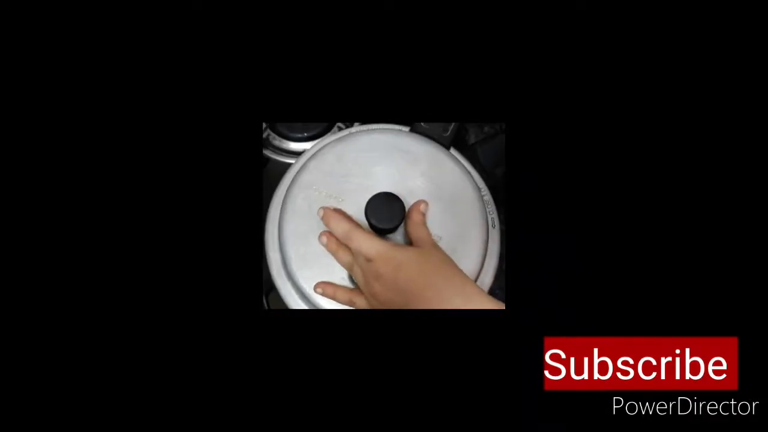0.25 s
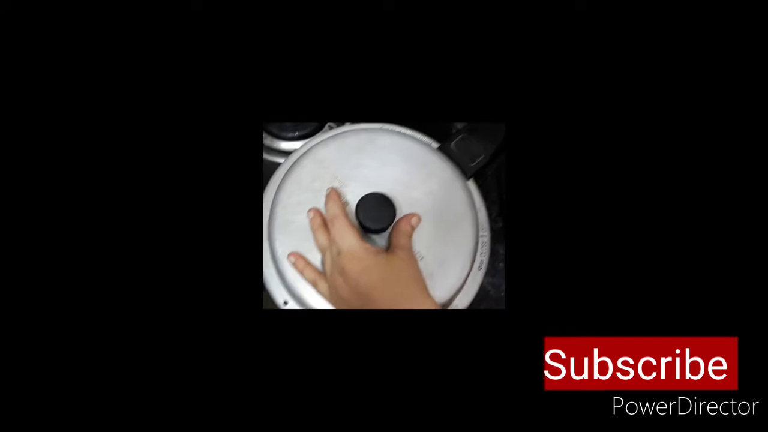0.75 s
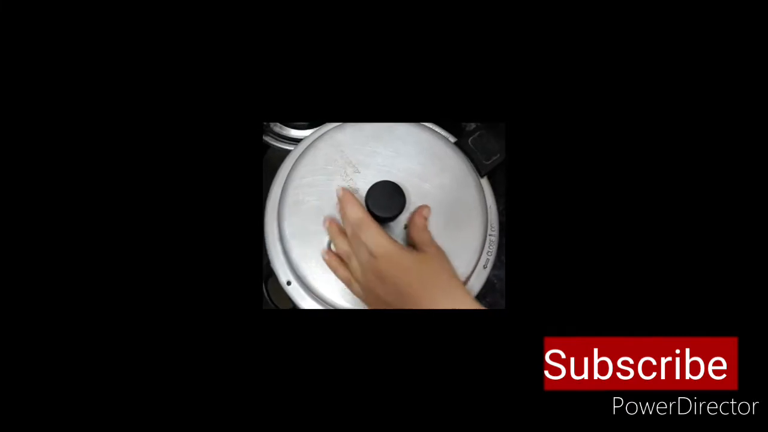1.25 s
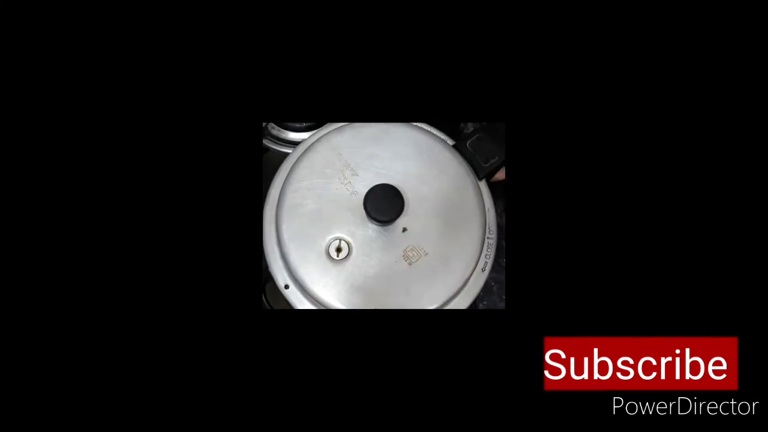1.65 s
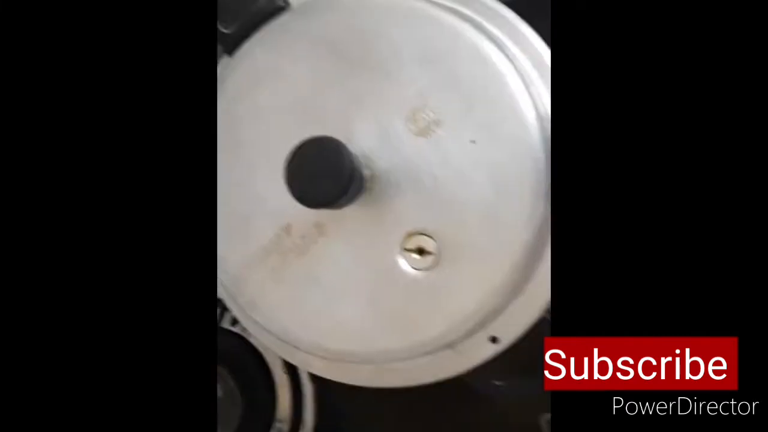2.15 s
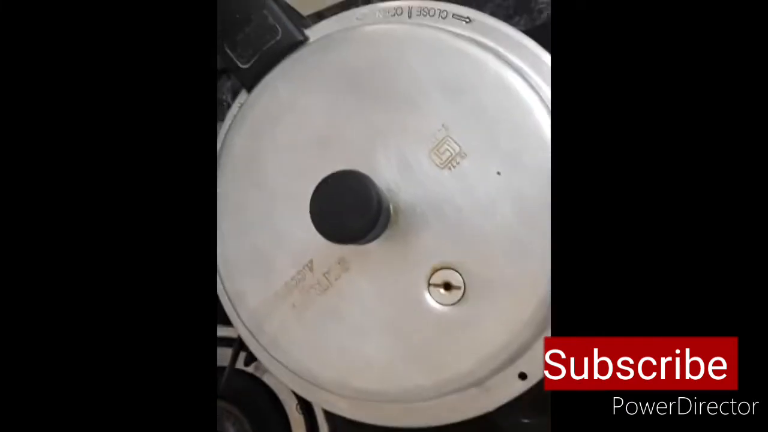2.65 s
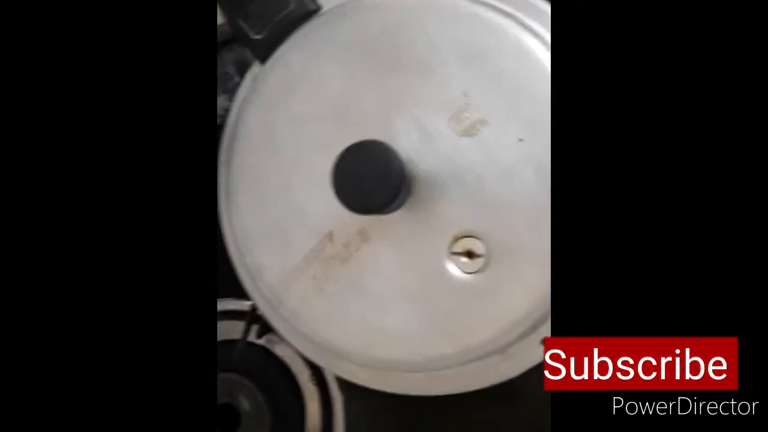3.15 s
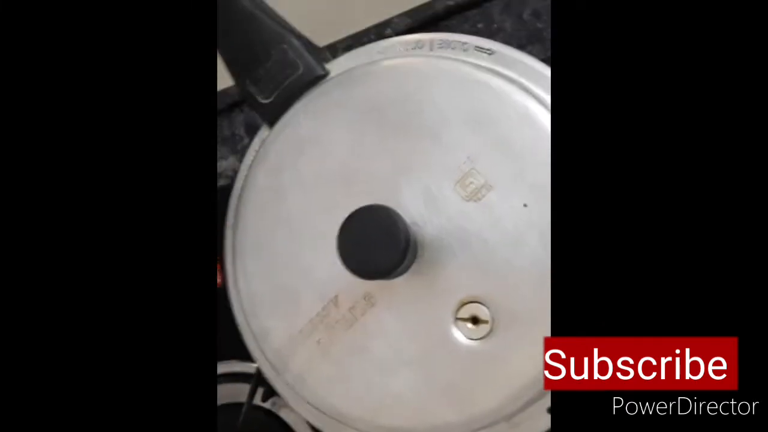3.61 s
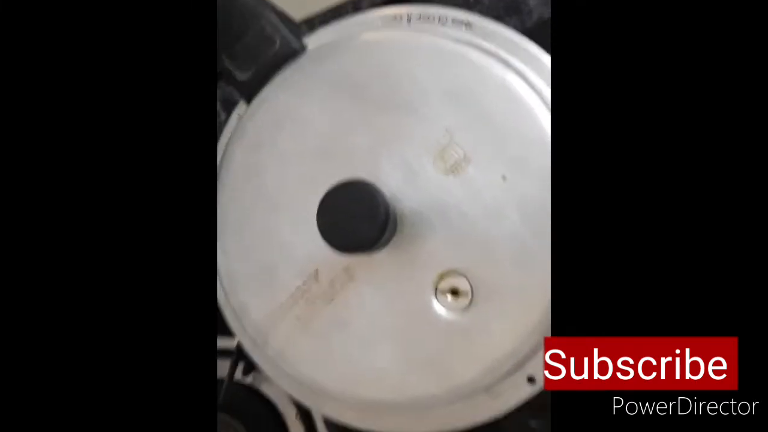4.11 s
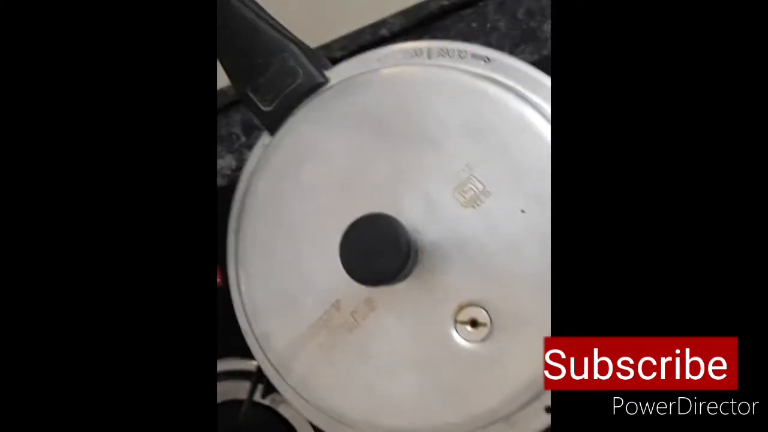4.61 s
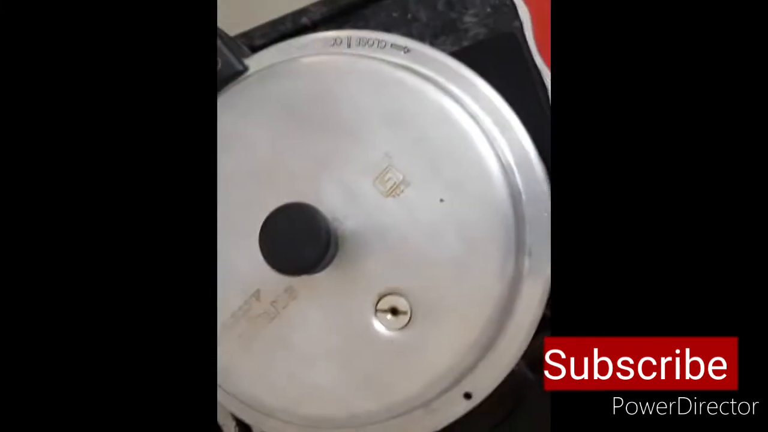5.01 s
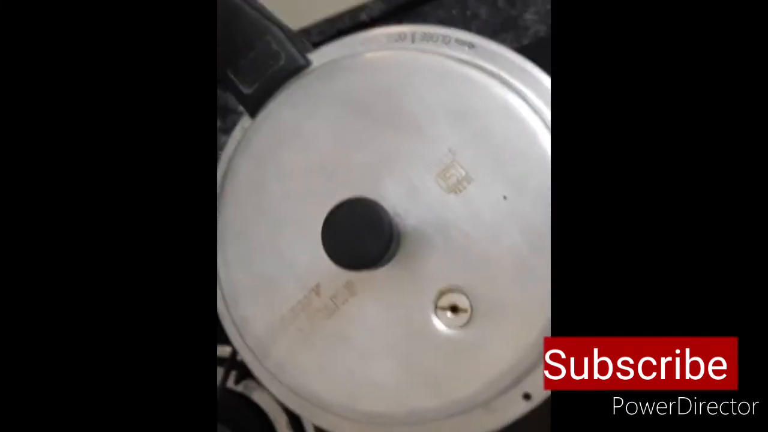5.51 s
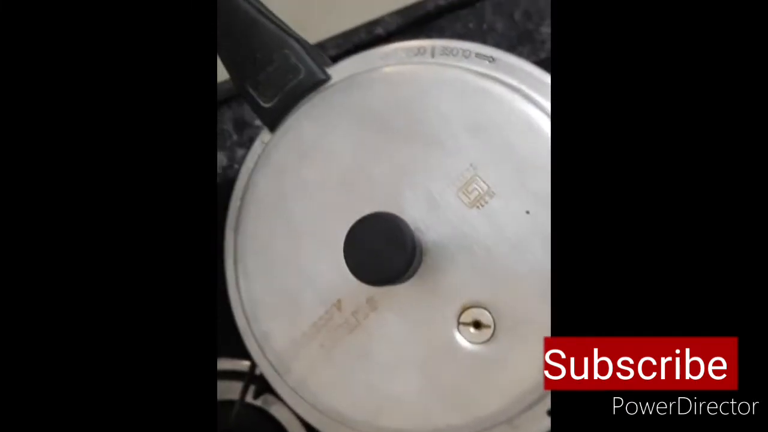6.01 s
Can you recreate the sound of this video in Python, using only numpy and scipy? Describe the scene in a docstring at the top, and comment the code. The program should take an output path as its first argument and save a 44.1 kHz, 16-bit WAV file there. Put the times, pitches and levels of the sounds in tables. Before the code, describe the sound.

A hand rubs and knocks a metal cooker lid, faint steam starts leaking, then a loud steady hiss blasts out, buffeting the close microphone.

```python
"""A pressure cooker on the stove in a small hard-walled kitchen, the microphone just above its lid.
First, over a simmering floor of noise, a hand rubs the lid amid knocks and ticks: friction noise, struck modes, damped
tones. Then the valve starts to leak, as sputtering noise that grows in two steps. After an instant of silence the
weight vents at full blast, as noise through the vent's resonances. Last, the microphone moves over the jet, where the
hiss is brighter and gusts and single eddies of steam buffet it."""
import sys
import numpy as np
from scipy import signal
from scipy.fft import rfft, irfft, next_fast_len
from scipy.io import wavfile
from scipy.ndimage import uniform_filter1d, minimum_filter1d

SR = 44100
rng = np.random.default_rng(int(sys.argv[2]) if len(sys.argv) > 2 else 0)


def to_wav(s):
    """Save 16-bit WAV."""
    ch = np.atleast_2d(s).T  # columns
    pcm = np.round(np.clip(ch, -1, 1) * 32767)  # PCM
    wavfile.write(sys.argv[1], SR, pcm.astype(np.int16))


N = 276219
TIME = np.arange(N) / SR
BINS_HZ = np.maximum(np.fft.rfftfreq(2 * N, 1 / SR), 1)
CUTOFF_HZ = 15500  # top of the microphone's range


def from_db(db):
    """Decibels to gain."""
    return 10 ** (np.asarray(db) / 20)


def rms_one(x):
    """Scale to an rms of 1."""
    return x / np.sqrt(np.mean(x ** 2) + 1e-20)


def in_time(rows):
    """One curve per column after the time column, joined by straight lines."""
    times_s, *columns = np.transpose(rows)
    return [np.interp(TIME, times_s, column) for column in columns]


def at_hz(points, hz):
    """Read a table on a log-frequency axis."""
    points = np.array(points)
    return np.interp(np.log(hz), np.log(points[:, 0]), points[:, 1])


def shaped(x, gain):
    """Give a steady sound a gain per frequency."""
    size = next_fast_len(N)
    hz = np.arange(size // 2 + 1) * SR / size
    return irfft(rfft(x, size) * np.interp(hz, BINS_HZ, gain), size)[:N]


def noise(colour):
    """Noise of the given spectrum, rms 1."""
    white = rng.standard_normal(N)
    return rms_one(shaped(white, from_db(at_hz(colour, BINS_HZ))))


def cut(x, hz, kind, order=2):
    """Causal Butterworth filter."""
    sos = signal.butter(order, np.clip(hz, 10, .45 * SR), kind, fs=SR, output="sos")
    return signal.sosfilt(sos, x + 1e-18)


def band(x, low_hz, high_hz):
    """The part of a steady sound between two frequencies."""
    return shaped(x, 1. * (BINS_HZ >= low_hz) * (BINS_HZ < high_hz))


def drift(rate_hz):
    """Random wander of spread 1, mostly slower than the given rate."""
    return rms_one(shaped(rng.standard_normal(N), 1 / (1 + (BINS_HZ / rate_hz) ** 2)))


def running_rms(x):
    """Level over about a seventh of a second."""
    return np.sqrt(uniform_filter1d(x ** 2, size=6000))


def lifted(resonances):
    """Gain per frequency of a few resonances standing out of a flat response."""
    gain = 1
    for hz, width_hz, lift_db in resonances:
        gain = gain + (from_db(lift_db) - 1) / (1 + (2 * (BINS_HZ - hz) / width_hz) ** 2)
    return gain


def swells(rows, rise_db_per_s, fall_db_per_s):
    """Gain of events that rise, hold and die away; overlapping ones add in power."""
    power = 0
    for start_s, hold_s, level_db in rows:
        before_s = np.maximum(start_s - TIME, 0)
        after_s = np.maximum(TIME - start_s - hold_s, 0)
        power = power + from_db(level_db - rise_db_per_s * before_s - fall_db_per_s * after_s) ** 2
    return np.sqrt(power)


# the simmering cooker and the room, relative spectrum: pitch_hz, level_db (per Hz)
FLOOR_COLOUR = [(25, -10), (86, 4), (173, -7.5), (300, -8.5), (700, -17), (1500, -28), (3000, -38),
                (3700, -12), (4700, -6.5), (6700, -21), (9500, -33), (14500, -22)]


def floor(level_db=-61):
    """The simmer and the room's own sound merge into one steady coloured noise."""
    return from_db(level_db) * noise(FLOOR_COLOUR)


# blows on and around the cooker; level before the band edges are cut, ring relative to it:
# start_s, level_db, low_edge_hz, high_edge_hz, rise_s, hollow_pitch_hz, lid_ring_db
KNOCK_EVENTS = [(0.001, -40.5, 1290, 5600, 0.00025, 4770, -30), (0.002, -39.5, 60, 2030, 0.0006, 900, -13),
                (0.117, -46.5, 60, 1100, .001, 392, -16), (0.165, -42.5, 60, 2300, 0.00088, 1000, -24),
                (0.371, -46.5, 60, 1100, 0.0018, 240, -20), (0.383, -37.5, 60, 1390, 0.00056, 760, -11),
                (0.761, -29, 90, 5400, 0.0035, 3900, -15.5), (0.978, -50, 200, 714, 0.002, 320, -25),
                (1.861, -34.5, 378, 746, 0.0042, 445, -27), (1.874, -40.5, 480, 4400, 0.0039, 640, -34)]
# relative spectrum of the blows: pitch_hz, level_db (per Hz)
KNOCK_SPECTRUM = [(50, -18), (85, -3.5), (125, -18), (180, -6), (250, -2), (340, -11.5), (430, -4.5),
                  (600, -9), (950, -8.5), (1400, -9.5), (1850, -4.5), (3000, -13.5), (4300, -10.5),
                  (6300, -20), (14000, -50)]
# ringing modes of the lid, level and decay before chance and the cap: pitch_hz, level_db, t60_s
LID_MODES = [(246, -1, 0.83), (430, -1.5, 1), (560, -34, 0.26), (870, 8, 0.19), (1240, 2, 0.25),
             (1615, -14, 0.54), (1750, 7, 0.26), (1880, -0.5, 0.75), (2460, 4, 0.25), (3600, -17, 0.33),
             (3800, -26, 0.25), (4200, 3, 0.36), (4673, -12, 0.26), (5100, -25, 0.26)]
# ring of the kitchen: pitch_hz, t60_s
KITCHEN_RING = [(100, 0.72), (260, 0.48), (700, 0.37), (1840, 0.42), (4850, 0.29), (12000, 0.15)]


def knocks(longest_s=0.71, direct_db=-3, direct_s=0.0021, hollow_db=5, hollow_q=5):
    """Each knock rings a hollow tone and the lid's modes, and sets the kitchen ringing, the bass longest."""
    out, age = np.zeros(N), TIME[:SR]
    fall_db = -60 * age  # divided by a t60, the decay in dB
    edges_hz = np.geomspace(50, 16000, 11)
    wash = noise(KNOCK_SPECTRUM)
    bands = []
    for low, high in zip(edges_hz, edges_hz[1:]):
        bands.append((band(wash, low, high), at_hz(KITCHEN_RING, np.sqrt(low * high))))
    chances = rng.standard_normal((len(KNOCK_EVENTS), len(LID_MODES)))
    for knock, chance in zip(KNOCK_EVENTS, chances):
        start_s, level_db, low_hz, high_hz, rise_s, hollow_hz, lid_db = knock
        start = max(int(start_s * SR), 0)
        room = sum(part[start:start + SR] * from_db(fall_db / t60) for part, t60 in bands)
        hollow = signal.lfilter(*signal.iirpeak(hollow_hz, hollow_q, fs=SR), room)
        metal = 0
        for (hz, mode_db, t60), c in zip(LID_MODES, chance):
            # each blow excites each mode by chance, with either sign
            ring = np.sign(c) * from_db(mode_db + 2 * c + fall_db / min(t60, longest_s))
            metal = metal + ring * np.sin(2 * np.pi * hz * age)
        # the direct sound stands out for the first few milliseconds
        attack = (1 - np.exp(-age / rise_s)) * (1 + from_db(direct_db) * np.exp(-age / direct_s))
        blow = (room + from_db(hollow_db) * hollow + from_db(lid_db) * metal) * attack
        out[start:start + SR] += from_db(level_db) * cut(cut(blow, low_hz, "high"), high_hz, "low")
    return out


# dry ticks, level before damping: start_s, level_db, pitch_hz
TICK_EVENTS = [(0.289, -27, 2600), (0.385, -25, 3500), (1.652, -29.5, 4500), (1.686, -32, 5200),
               (2.116, -23.5, 1500), (2.19, -28, 4500)]
# a finger bumps the microphone, level before damping: start_s, level_db, pitch_hz, length_s
MICROPHONE_BUMP = (2.117, -35, 88, .018)


def handling(tick_s=0.00016):
    """Tiny dry ticks close by, and one soft, quickly damped bump on the microphone's case."""
    out = np.zeros(N)
    for start_s, level_db, hz in TICK_EVENTS:
        age = np.maximum(TIME - start_s, 0)
        out += from_db(level_db) * np.sin(2 * np.pi * hz * age) * np.exp(-age / tick_s)
    start_s, level_db, hz, length_s = MICROPHONE_BUMP
    age = np.maximum(TIME - start_s, 0)
    return out + from_db(level_db) * np.sin(2 * np.pi * hz * age) * np.exp(-(age / length_s) ** 4)


# strokes of the palm on the lid: start_s, hold_s, level_db
PALM_STROKES = [(.36, 0.29, -50), (.59, 0.077, -44.5), (1.11, 0.015, -52), (1.36, .015, -62)]
STROKE_RISE_DB_PER_S, STROKE_FALL_DB_PER_S = 260, 130
# faint friction between strokes, until the hand stops resting on the lid
RESTING_HAND_DB, RESTING_ENDS_S = -66, 1.2
# relative spectrum of skin on metal: pitch_hz, level_db (per Hz)
FRICTION_COLOUR = [(59, -39), (100, -8), (188, -12), (300, -6), (682, -17), (936, -6), (1180, -13),
                   (1840, -11), (2470, -17), (2630, -17), (4660, -8.5), (9740, -35.5), (15500, -38)]


def rubbing(grip_db=0.8, body_hz=650):
    """Skin grips and slips on the metal; only a firm stroke moves the lid enough to sound its bass."""
    palm = swells(PALM_STROKES, STROKE_RISE_DB_PER_S, STROKE_FALL_DB_PER_S)
    resting = from_db(RESTING_HAND_DB) * (TIME < RESTING_ENDS_S)
    stroke = np.hypot(palm, resting)
    firmness = np.sqrt(stroke / stroke.max())
    friction = noise(FRICTION_COLOUR)
    light = shaped(friction, 1 / (1 + (body_hz / BINS_HZ) ** 4))
    bass = friction - light
    return stroke * from_db(grip_db * drift(60)) * (light + firmness * bass)


# the valve seat gives way in steps, each adding to the leak: start_s, level_db
SEAT_STEPS = [(1.51, -57.5), (1.675, -51.5)]
# relative spectrum of the leaking steam: pitch_hz, level_db (per Hz)
LEAK_SPECTRUM = [(300, -22), (1200, -17.5), (2200, -13.5), (3100, -7.5), (4000, -8), (5400, -1.5),
                 (6300, -15), (9500, -30), (15000, -26)]
# tones of the valve seat: pitch_hz, width_hz, lift_db
SEAT_TONES = [(2560, 190, 10.5), (5300, 320, 7)]


def leak(sputter_db=1.8, opens_s=.045):
    """Wet steam sputters through the valve seat with an airy tone and about its octave, more at each step."""
    power = 0
    for start_s, level_db in SEAT_STEPS:
        age = np.maximum(TIME - start_s, 0)
        power = power + from_db(level_db) ** 2 * (1 - np.exp(-age / opens_s))
    sputter = from_db(sputter_db * drift(90))
    steam = rms_one(shaped(noise(LEAK_SPECTRUM), lifted(SEAT_TONES)))
    return np.sqrt(power) * sputter * steam


# microphone position: start_s, share (0 beside the jet, 1 over it)
MICROPHONE_PATH = [(3.52, .005), (3.64, 0.21), (4.06, 0.072), (4.13, .9), (4.65, 0.94), (5.6, 0.95),
                   (6.2, 0.76)]


def over_jet():
    """How far the microphone is over the jet, 0 to 1."""
    return np.clip(in_time(MICROPHONE_PATH)[0], 0, 1)


# the plume sweeps across the microphone, level of its rumble: start_s, hold_s, level_db
PLUME_GUSTS = [(4.17, 0.43, -27), (4.94, 0.049, -43), (5.14, 0.013, -38.5), (5.48, 0.24, -43)]
GUST_RISE_DB_PER_S, GUST_FALL_DB_PER_S = 165, 262
DRAUGHT_DB = -49  # steady draught right over the jet
# relative spectrum of the draught: pitch_hz, level_db (per Hz)
DRAUGHT_SPECTRUM = [(15, -52), (25, -51), (71, -9.5), (134, -4), (295, -3.5), (479, -3.5), (604, -4.5),
                    (710, -5.5), (1800, -6.5), (2340, -14), (3960, -120)]
PLUME_HISS_DB, PLUME_HISS_HZ = 5.5, (7900, 9100)  # hiss of a gust, relative to its rumble
# single eddies hitting the microphone, level that push and puff are set against: centre_s, level_db
EDDIES = [(4.177, -16.5), (4.254, -11.5), (4.272, -12), (4.337, -15.5), (4.358, -15), (4.368, -12),
          (4.437, -14.5), (4.464, -13.5), (4.478, -18), (4.492, -10.5), (4.55, -8.5), (4.596, -14)]


def buffeting(lumpy_db=2.5, surge_db=1.5, eddy_s=0.0014, eddy_db=1, spray_db=-9, spray_s=0.0023):
    """Gusts make lumpy noise and a narrow hiss at the port; a big eddy is a push and pull amid a short puff."""
    draught = noise(DRAUGHT_SPECTRUM)
    lumps_db = lumpy_db * drift(76) + surge_db * drift(19)
    turbulence = rms_one(draught * from_db(lumps_db))
    puff = cut(noise(DRAUGHT_SPECTRUM), 280, "high")
    hiss = rms_one(cut(rng.standard_normal(N), PLUME_HISS_HZ, "band"))
    gusts = swells(PLUME_GUSTS, GUST_RISE_DB_PER_S, GUST_FALL_DB_PER_S)
    wind = np.hypot(gusts, from_db(DRAUGHT_DB) * np.sqrt(over_jet()))
    out = wind * (turbulence + from_db(PLUME_HISS_DB) * hiss)
    chances = rng.standard_normal((len(EDDIES), 2))
    for (centre_s, level_db), (size_db, side) in zip(EDDIES, chances):
        age = (TIME - centre_s) / (eddy_s * from_db(size_db))
        # pressure swings through zero at the centre, in either direction
        push = from_db(eddy_db) * np.sign(side) * np.tanh(5 * age) * np.exp(-np.abs(age))
        spray = from_db(spray_db) * puff * np.exp(-np.abs(TIME - centre_s) / spray_s)
        out = out + from_db(level_db) * (push + spray)
    return out


def wall_ripple(decay_s=.025, share=.4):
    """Many wall echoes add to the direct sound and ripple its spectrum."""
    echoes = rng.standard_normal(2 * N) * np.exp(-np.arange(2 * N) / SR / decay_s)
    return np.abs(1 + share * rfft(echoes / np.linalg.norm(echoes)))


# relative jet spectrum beside it and over it: pitch_hz, level_db (per Hz)
BESIDE_COLOUR = [(60, -39), (150, -37.5), (450, -35), (900, -26.5), (1600, -17), (2100, -11), (3200, 1.5),
                 (3750, -2.5), (4500, -2), (5700, -9.5), (7500, -15), (10200, -16.5), (12200, -11.5),
                 (14100, -3), (15400, -9.5)]
OVER_COLOUR = [(60, -48), (200, -42.5), (800, -25), (1700, -16.5), (2300, -11.5), (3100, 2.5), (3800, -6.5),
               (4600, -6.5), (7400, -2), (9000, -7), (9900, -13.5), (11600, -13.5), (13500, -4),
               (15400, -4)]
# resonances of vent, weight and lid, heard beside the jet and over it: pitch_hz, width_hz, lift_db
BESIDE_RESONANCES = [(1970, 46, 7.5), (2357, 270, 5), (2550, 19, 9), (3010, 27, 3), (3113, 61, 7.5),
                     (3340, 75, 9), (3523, 17.5, 12.5), (3880, 40, 10), (4060, 29, 5.5), (4230, 154, 6.5),
                     (4500, 62, 5), (5060, 270, 7), (6050, 120, 7), (6990, 70, 8), (9000, 350, 2.5)]
OVER_RESONANCES = [(1770, 26, 8.9), (1996, 25, 5.2), (2200, 18, 7.3), (2385, 33, 4.8), (2536, 28, 5.2),
                   (3132, 8.5, 10.5), (3370, 30, 2.2), (3420, 41, 5.4), (3570, 23, 12), (3936, 230, 6.8),
                   (4360, 36, 3.8), (5020, 350, 5.6), (6210, 107, 7.6), (7450, 130, 4.1), (8640, 80, 6),
                   (11740, 340, 4.7)]
# level of the jet's roar (the ROAR_HZ band) at the microphone, before shimmer: start_s, level_db
ROAR_CURVE = [(2.27, -13), (3.3, -13.5), (4.06, -12.5), (4.12, -16), (4.55, -17), (4.59, -18.5),
              (4.89, -17), (4.9, -18), (6.11, -15.5), (6.22, -15)]
# level of the top treble, which is beamed narrowly, before shimmer: start_s, level_db
TREBLE_CURVE = [(2.27, -21.5), (2.49, -21), (2.98, -23.5), (3.58, -20), (3.66, -17.5), (3.92, -16.5),
                (4.05, -20), (4.12, -14.5), (4.22, -14), (4.26, -18), (4.62, -14), (4.78, -22.5),
                (4.93, -17), (6.22, -17)]
ROAR_HZ, TREBLE_FROM_HZ = (1500, 5600), 10500


def jet(shimmer_db=0.36, roar_db=0.0, treble_db=0.0):
    """Turbulence sounds the vent's resonances; over the jet hiss gains on roar, and top treble swells alone."""
    over = over_jet()
    beside = rms_one(shaped(noise(BESIDE_COLOUR), lifted(BESIDE_RESONANCES) * wall_ripple()))
    above = rms_one(shaped(noise(OVER_COLOUR), lifted(OVER_RESONANCES) * wall_ripple()))
    steam = np.sqrt(1 - over) * beside + np.sqrt(over) * above
    # even out each part's level, then let its own curve set it
    body = band(steam, 0, TREBLE_FROM_HZ) / running_rms(band(steam, *ROAR_HZ))
    treble = band(steam, TREBLE_FROM_HZ, CUTOFF_HZ)
    treble = treble / running_rms(treble)
    body_level_db = in_time(ROAR_CURVE)[0] + roar_db + shimmer_db * drift(3.7)
    treble_level_db = in_time(TREBLE_CURVE)[0] + treble_db + shimmer_db * drift(3.2)
    return body * from_db(body_level_db) + treble * from_db(treble_level_db)


PAUSE_FROM_S, STEAM_ON_S = 2.197, 2.241


def scene():
    """The quiet cooker, an instant of silence, then the full blast; alike in both ears."""
    quiet = knocks() + handling() + rubbing() + leak() + floor()
    blast = jet() + buffeting()
    mono = quiet * (TIME < PAUSE_FROM_S) + blast * (TIME >= STEAM_ON_S)
    return np.stack([mono, mono])


def record(dry):
    """The microphone drops the deep bass, a fast limiter holds the tallest peaks, and the top is cut steeply."""
    heard = cut(dry, 60, "high")
    allowed = 1 / np.maximum(np.abs(heard) / .97, 1)
    # the gain turns down just ahead of each peak
    gain = uniform_filter1d(minimum_filter1d(allowed, size=61), size=61)
    top_cut = signal.ellip(10, .05, 50, CUTOFF_HZ, fs=SR, output="sos")
    return signal.sosfiltfilt(top_cut, gain * heard)


dry = scene()
out = record(dry)
to_wav(out)
```